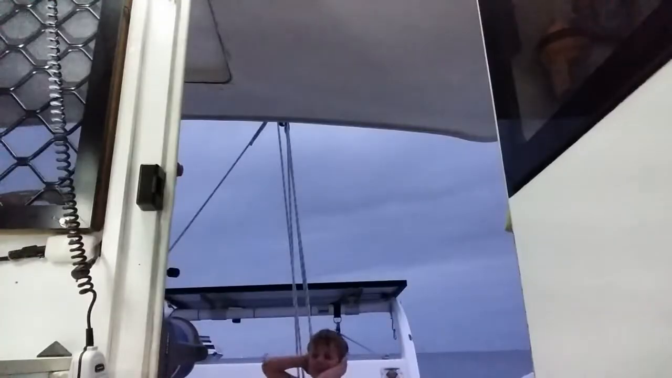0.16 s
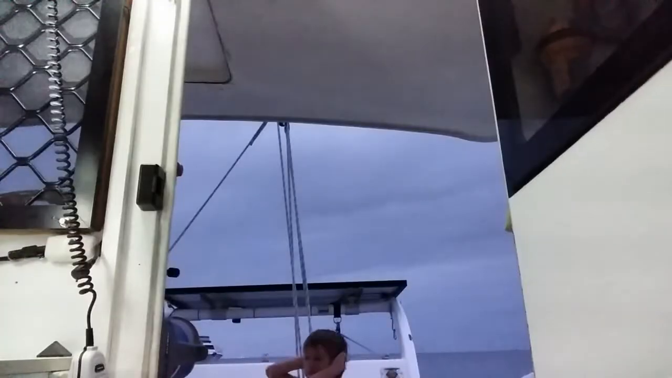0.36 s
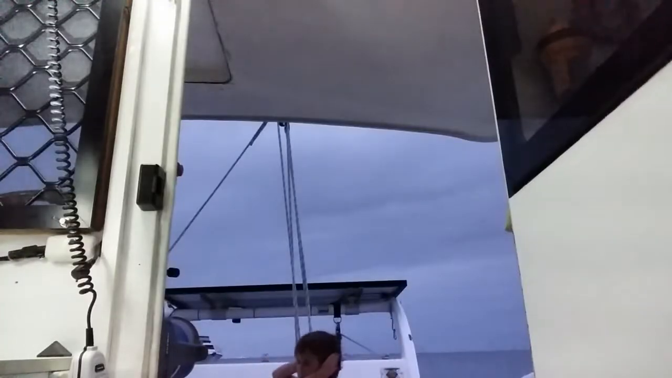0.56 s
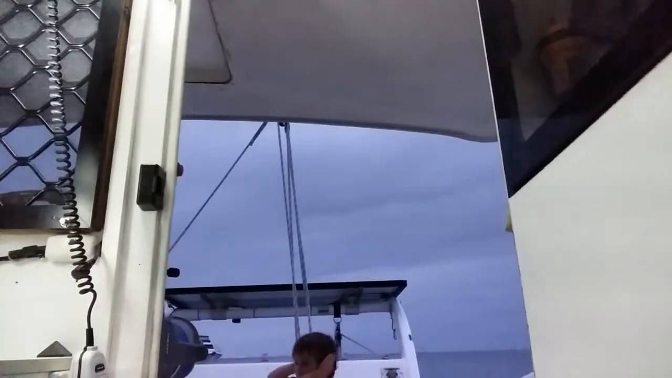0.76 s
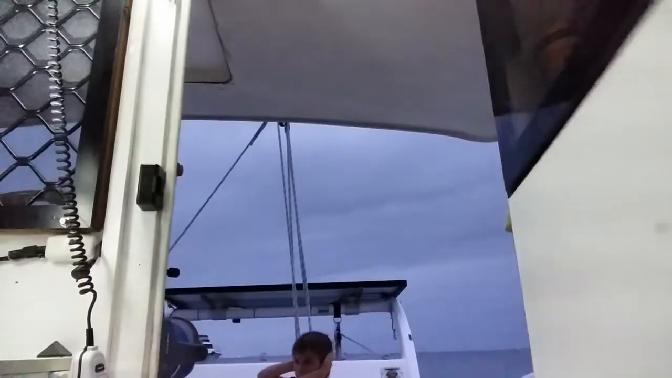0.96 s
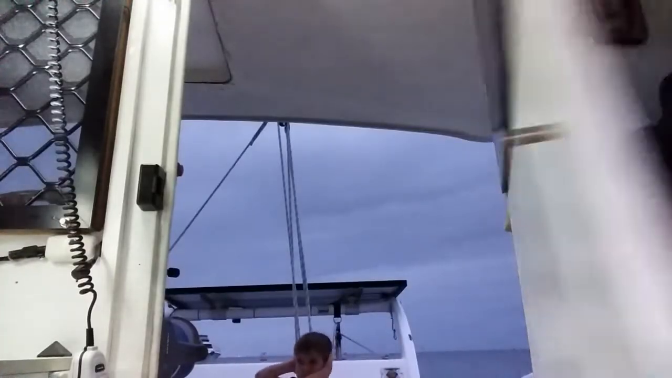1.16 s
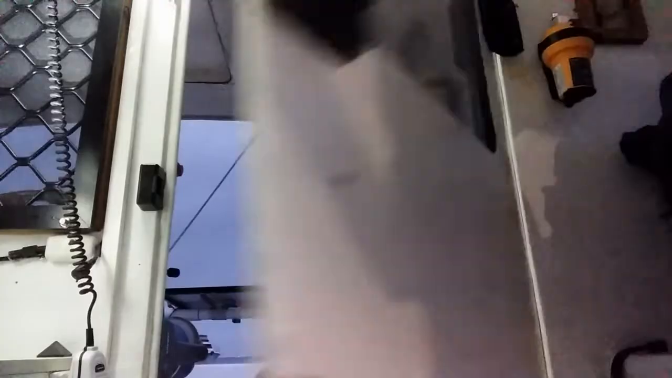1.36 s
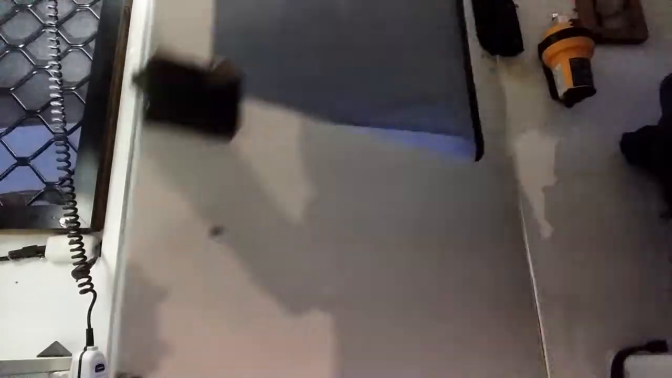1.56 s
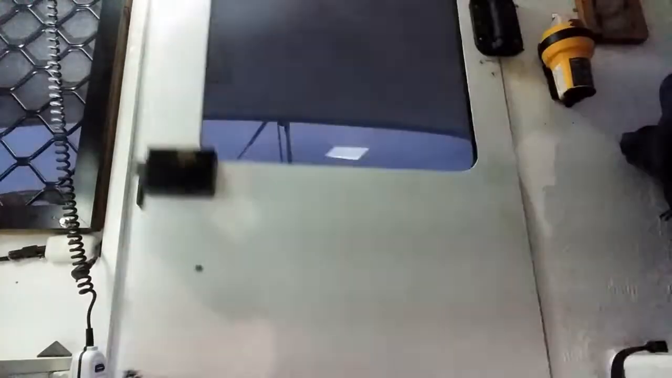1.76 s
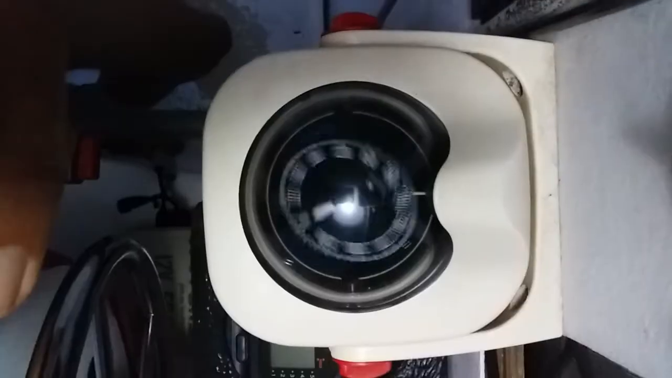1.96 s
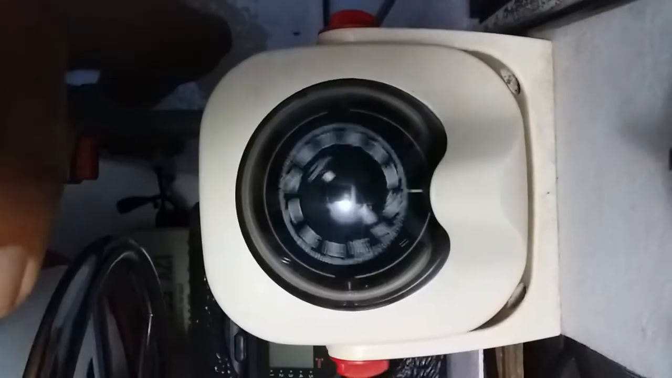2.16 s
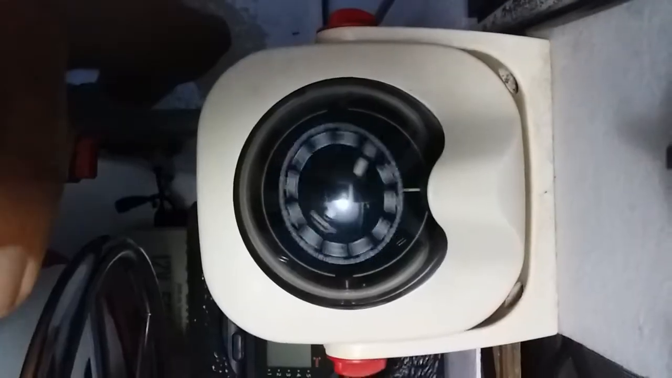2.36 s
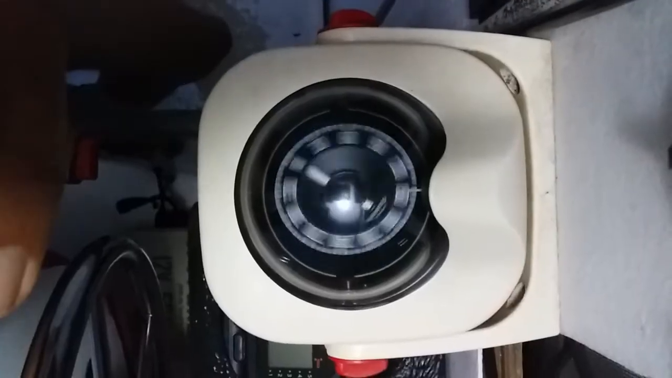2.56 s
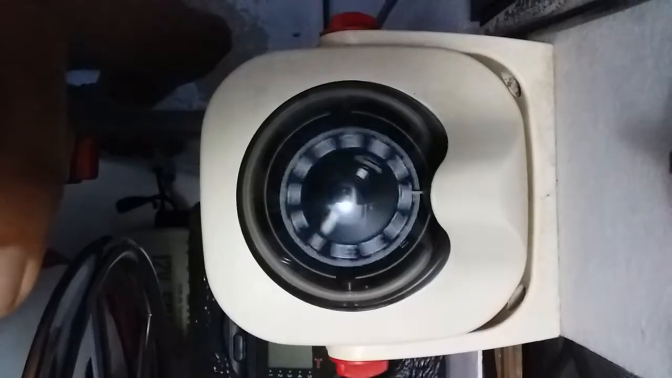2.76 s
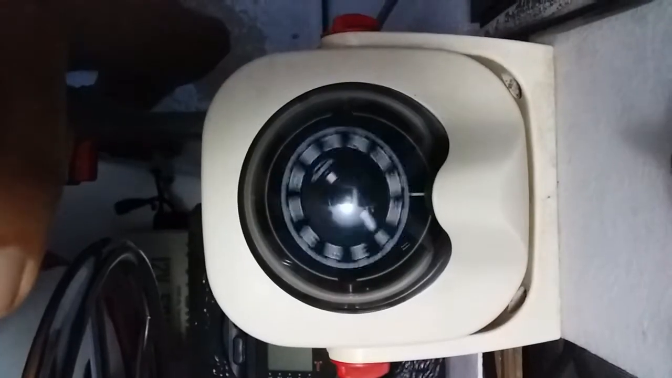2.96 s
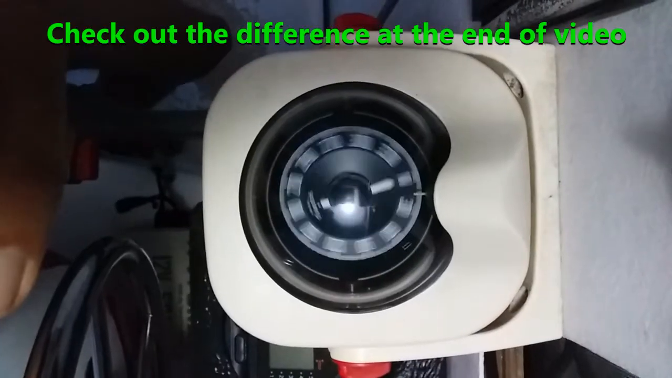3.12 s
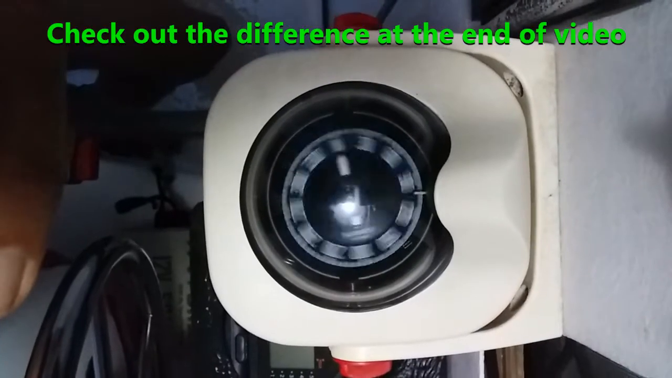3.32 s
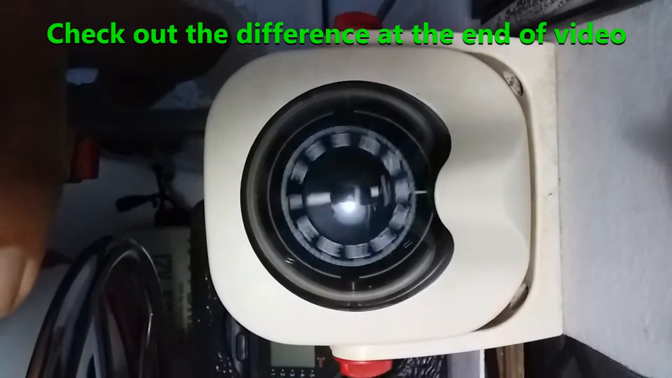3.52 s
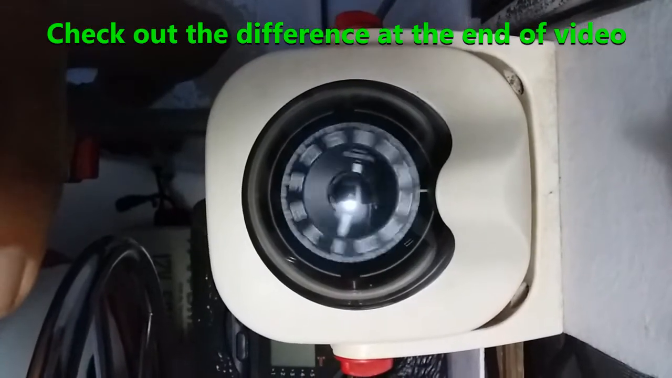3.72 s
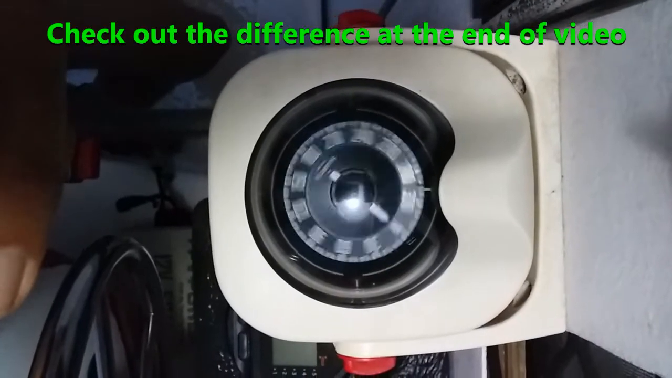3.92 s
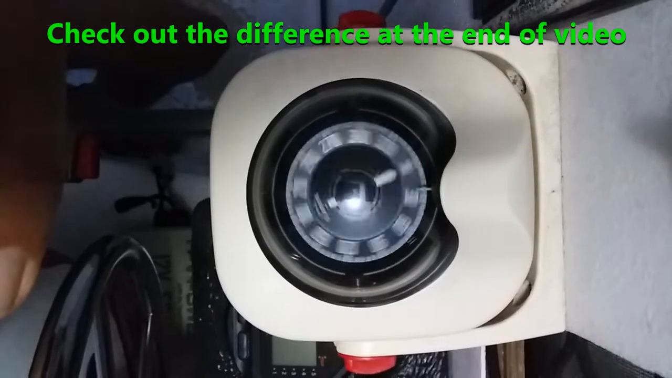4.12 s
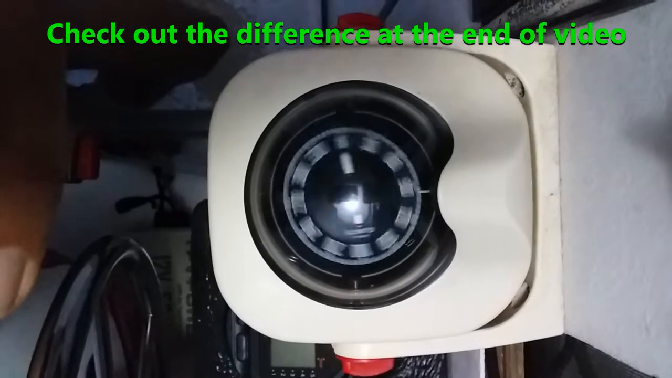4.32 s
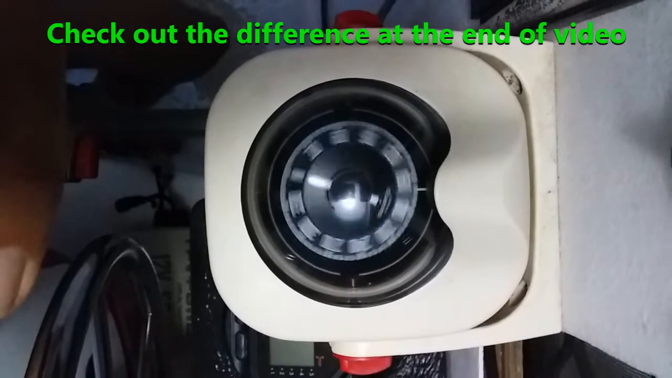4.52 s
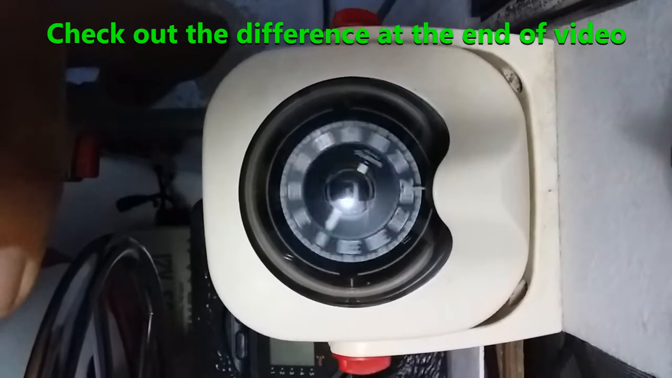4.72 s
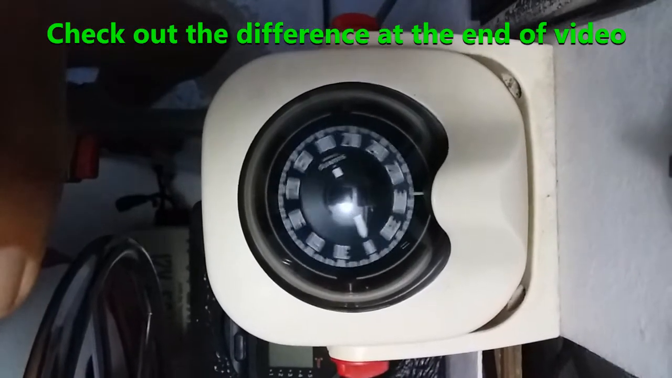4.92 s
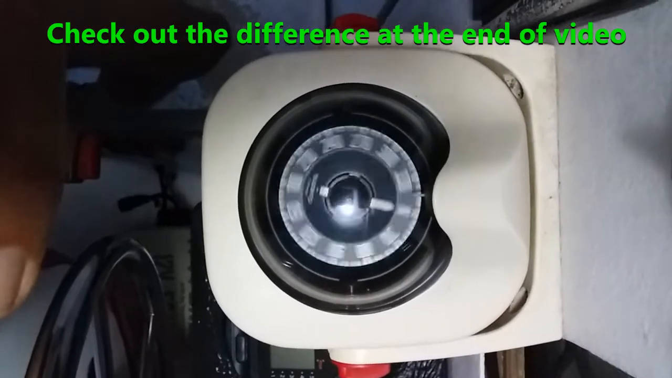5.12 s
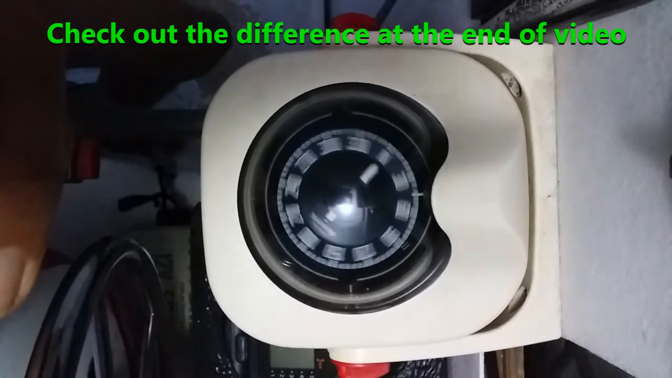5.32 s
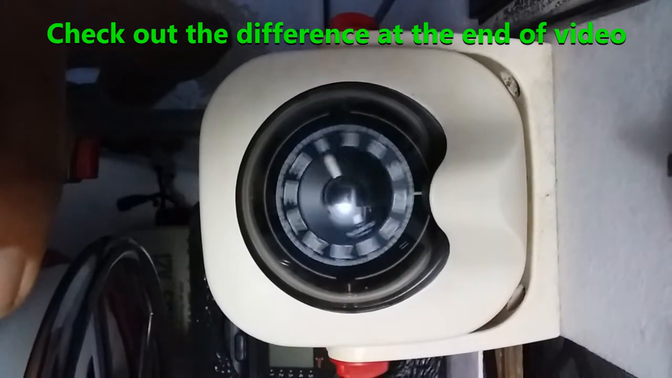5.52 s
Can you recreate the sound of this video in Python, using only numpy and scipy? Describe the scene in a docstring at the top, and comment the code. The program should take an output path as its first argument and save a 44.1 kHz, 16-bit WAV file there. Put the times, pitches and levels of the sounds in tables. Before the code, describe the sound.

A boat cabin heard from close by. At first there is a quiet, wavering low rumble from outside, steady hiss and a barely audible, very high whine. A faint tick comes near 0.4 s, then at 0.8-0.95 s the door is unhooked in a quick clatter of clunks and metal clinks. Light knocks and a tiny hinge creak follow while stirred air softly swells. At 1.86 s the door slams: a hard crack, deep panel boom and rapid shuddering rebounds, with loose parts rattling. Near 2 s the latch pings and thumps, then two loud hollow knocks land at 2.15-2.2 s, with small chattering squeaks until 2.5 s. The background is pushed down by the loud peaks and recovers around 3.2 s, revealing a slow, low buzzing motor with repeating rattle and unsteady rushing. Faint knocks pass near 3 s; soft deck thuds and sharper knocks come at 5.3-5.55 s.

```python
"""A low rumble from outside a boat's cabin comes first, with a hiss and a thin whine; then the door is unhooked.
It swings and slams: ringing modes make its panel boom, shaped noise makes the clatter, and the rebounds shudder.
The rumble gives way to a slow motor, built from shaft harmonics, a repeating rattle and rushing noise.
Knocks come before and after the slam, the latch pings and squeaks, and late thuds come through the deck.
Loud peaks turn the recorder's gain down; it recovers about a second after the last of them."""
import sys
import numpy as np
from scipy import signal
from scipy.fft import irfft
from scipy.io import wavfile
from scipy.ndimage import minimum_filter1d

SR = 44100
rng = np.random.default_rng(int(sys.argv[2]) if len(sys.argv) > 2 else 0)


def int16_out(signal):
    """Quantize to a 16-bit WAV file."""
    q = np.round(np.clip(np.atleast_2d(signal).T, -1, 1) * 32767)
    wavfile.write(sys.argv[1], SR, q.astype(np.int16))


N = 246078
T = np.arange(N) / SR

# Levels in the tables are relative; t60 is the time a sound takes to fall by 60 dB.
# outside rumble: (f/Hz, level/dB per Hz)
OUTSIDE_SPECTRUM = [(25, -20.5), (42, 4), (70, -2), (110, 4), (170, -13), (300, -12), (500, -30),
                    (900, -18), (1100, -28), (1370, -20.5), (1650, -40.5), (2200, -22.5), (3200, -45.5),
                    (9000, -44)]
# steady hiss: (f/Hz, level/dB per Hz)
HISS_SPECTRUM = [(100, 11), (2500, 0.5), (3300, -5), (4400, -4.5), (5300, 2), (7000, -1), (8700, -1),
                 (9500, -20), (14000, -21), (15500, -9.5)]
# blows on the door: (t/s, clatter level/dB, contact hardness f/Hz, clatter t60/s)
DOOR_BLOWS = [(0.364, -51, 9000, 0.14), (0.370, -43.5, 13500, 0.31), (0.7975, -44.5, 6050, 0.11),
              (0.8178, -25, 4950, 0.029), (0.830, -31, 2830, 0.15), (0.8404, -19, 4130, 0.057),
              (0.864, -24.5, 2690, 0.14), (0.893, -40, 1690, 0.4), (0.936, -45, 5900, 0.032),
              (0.986, -37, 2020, 0.11), (2.011, -23.5, 890, .14), (2.029, -16.5, 9800, 0.08),
              (2.117, -33, 2910, 0.14), (2.2919, -37, 17080, 0.22)]
# ringing tones of the door panel: (f/Hz, level/dB, t60/s)
PANEL_MODES = [(57, -21.5, 0.12), (104, -2, 0.23), (126.4, -2.5, 0.22), (150.7, -6.5, 0.41),
               (187.5, 1.5, 0.14), (223, -10.5, 0.22), (271.3, -2.5, 0.12), (383, -4.5, 0.19),
               (444, -10.5, 0.17), (492.3, -8.5, 0.24), (524, -6, 0.15), (657.6, -10, 0.17),
               (761, -24.5, 0.28), (815, -23.5, 0.35), (965.5, -20.5, 0.25)]
# clatter of the loose fittings and cabin walls: (f/Hz, level/dB per Hz)
CLATTER_SPECTRUM = [(60, -23), (150, -13), (300, 2.5), (700, -0.5), (1100, -0.5), (2000, 0), (3200, -4),
                    (4600, -5), (7000, -4), (8900, -0.5), (10000, -16.5), (16000, -20.5)]
# booming cabin air: (f/Hz, level/dB per Hz)
BOOM_SPECTRUM = [(30, -19), (55, 0.5), (100, -9.5), (150, 5), (260, 0), (320, -11.5), (450, 0),
                 (700, -22.5), (1200, -42), (3000, -56.5)]
# resonances of the door frame: (f/Hz, width/Hz, lift level/dB)
FRAME_RESONANCES = [(280, 49, 7.5), (494.4, 9.3, 6), (748, 61, 5), (997, 65, 3.5), (1150, 36, -2.5),
                    (1540, 22, 4), (1932, 53, 3.5), (2318, 31, 8.5), (3140, 130, 2.5), (4026, 22, 6.5)]
# door hook and catch, clusters of tones: (f/Hz, width/Hz, level/dB, t60/s)
HOOK_AND_CATCH_MODES = [(2665, 740, 0, 0.032), (1990, 350, -5.5, 0.076), (253, 66, -12, 0.49)]
# strikes on the hook and catch: (t/s, level/dB)
HOOK_AND_CATCH_STRIKES = [(0.842, -23.5), (0.864, -27.5), (2.031, -15)]
# knocks on a hollow casing close by: (t/s, level/dB, contact hardness f/Hz, t60/s)
CASING_KNOCKS = [(1.149, -44.5, 1400, .22), (1.454, -43.5, 1780, 0.15), (1.705, -54, 1690, 0.11),
                 (1.756, -47, 2200, 0.38), (2.154, -11, 3560, 0.17), (2.200, -8, 2500, 0.11),
                 (2.410, -36.5, 1520, 0.18), (2.453, -35, 2800, 0.28), (2.480, -35, 2010, 0.2),
                 (2.933, -40, 1600, 0.12), (2.992, -44, 1600, 0.24), (3.125, -50.5, 1390, 0.15),
                 (3.200, -48.5, 1400, 0.13), (5.275, -54.5, 3000, 0.29), (5.4565, -39.5, 774, 0.17),
                 (5.475, -48, 2510, .12), (5.486, -31, 1720, 0.21), (5.5115, -25.5, 2640, 0.22),
                 (5.545, -41.5, 5750, 0.11)]
# clatter of the casing: (f/Hz, level/dB per Hz)
CASING_SPECTRUM = [(60, -25), (150, -8.5), (300, -1), (600, -7.5), (800, 1.5), (950, -6.5), (1300, 1),
                   (1600, -1), (2300, -4), (3200, -4), (4600, -9.5), (8900, -4), (10000, -17.5),
                   (16000, -23.5)]
# resonances of the hollow casing: (f/Hz, width/Hz, lift level/dB)
CASING_RESONANCES = [(264.5, 12, 7.5), (480, 110, 9), (672, 37, 15), (1454, 87, 8), (1869, 85, 7.5),
                     (2170, 74, 5), (3000, 100, 0)]
# hinge, a cluster of tones: (f/Hz, width/Hz, level/dB, t60/s)
HINGE_MODES = [(990, 210, 0, 0.094)]
# short creaks of the hinge: (t/s, level/dB)
HINGE_CREAKS = [(1.150, -52), (1.758, -45), (1.783, -46)]
# the motor's strong harmonics: (multiple of the shaft rate, level/dB)
STRONG_HARMONICS = [(5, -3), (8, 2), (10, 2.5), (11, 1), (12, -6), (13, 1), (14, -8), (15, 3), (16, -4),
                    (19, -9.5), (22, -9), (24, -13.5)]
# motor rattle: (f/Hz, level/dB per Hz)
RATTLE_SPECTRUM = [(45, -22), (130, 0.5), (450, 3), (560, -1.5), (680, -10), (780, -8), (920, -3.5),
                   (1030, 3), (1250, -2.5), (1650, -8), (2200, -6.5), (3000, -12.5), (4000, -32.5)]
# deeper part of the motor's rushing: (f/Hz, level/dB per Hz)
RUSH_SPECTRUM = [(30, -24), (60, -3.5), (100, 10.5), (200, 9), (350, 7.5), (600, -1.5), (800, -11),
                 (1100, -7.5), (1700, -31.5), (2800, -17), (4000, -29.5), (5500, -10), (7000, -30),
                 (15000, -116.5)]
# wash in the motor's rushing: (f/Hz, level/dB per Hz)
WASH_SPECTRUM = [(300, -10), (700, 3.5), (1100, 4), (1700, -5.5), (2300, -1.5), (3000, 1), (4200, -9.5),
                 (9000, -46)]
# slow change of the motor's loudness: (t/s, level/dB)
MOTOR_LEVEL = [(2.6, -.5), (3.1, -1.5), (3.6, 2), (4.0, 0), (5.4, -.3)]
# loose parts shaken by the slam, lightest first: (f/Hz, width/Hz, level/dB, t60/s)
LOOSE_PARTS = [(8794, 460, -7, 0.047), (3620, 600, -6.5, 0.082), (490.5, 180, 0, 0.085),
               (182, 3.3, -4, .28)]
# the door's thin skin, slapped at every rebound: (f/Hz, width/Hz, level/dB, t60/s)
SKIN_MODES = [(429, 240, -8.5, .08)]
# ringing tones of the steel latch: (f/Hz, level/dB, t60/s)
LATCH_MODES = [(3620, -15.5, 0.23), (6850, -8.5, 0.089), (8030, -12, 0.072), (8450, -5, .11),
               (9495, -1, .12), (9460, -10.5, .1), (12900, -24.5, 0.092), (15400, -12.5, 0.086)]
# strikes on the latch: (t/s, level/dB)
LATCH_PINGS = [(1.972, -5.5), (2.2915, -20.5)]
# latch squeaks: (t/s, length/s, start f/Hz, end f/Hz, level/dB)
LATCH_SQUEAKS = [(2.321, 0.028, 2380, 1790, -36.5), (2.343, 0.037, 2180, 2285, -33),
                 (2.365, 0.052, 1890, 1650, -43.5), (2.391, 0.059, 3210, 2610, -39.5),
                 (2.436, .045, 2078, 2137, -30.5)]
# ringing tones of the deck: (f/Hz, level/dB, t60/s)
DECK_MODES = [(72, -24, 0.17), (97.4, 12.5, 0.14), (132, 10, 0.26), (148.6, 13, 0.17), (205.3, 2, 0.35)]
# soft thuds through the deck: (t/s, level/dB)
DECK_THUDS = [(5.271, -32), (5.281, -27.5), (5.312, -35), (5.4565, -36), (5.490, -27)]

# air stirred by the door swells until it swings fastest, then holds until the slam
SWING_FASTEST_S, SWING_DB, SWING_RISE_DB_PER_S = 1.3, -65, 27
# a softer contact pushes the panel more: boom equals clatter at EVEN_HZ and falls with every octave above it
EVEN_HZ, BOOM_DB_PER_OCTAVE = 1800, 12.5
# every knock stirs the panel a little and bounces once
KNOCK_BOOM_DB, BOUNCE_S, BOUNCE_DB = -17.5, .013, -6
# the rumble starts to give way to the motor
MOTOR_START_S = 1.77
SHAFT_HZ = 22.43
# the other harmonics lie under one broad hump, 1 dB down at HUMP_WIDTH_HZ from the centre
HUMP_HZ, HUMP_WIDTH_HZ, HUMP_DB = 311, 47, -11.5
# the slam: one hard, short contact
SLAM_S, SLAM_DB, SLAM_HARD_HZ, SLAM_T60_S = 1.8604, 0.5, 12200, 0.1
# heavier loose parts start later, by this much for each octave they ring lower
LAG_S_PER_OCTAVE = .0198
# the door then shudders against its frame, its rebounds weakening on average
REBOUND_GAP_S, REBOUND_HARD_HZ, REBOUND_T60_S = .0168, 6486, .21
REBOUND_DB, REBOUND_FALL_DB_PER_S = -2, 57.5
SHUDDER_BOOM_DB, BOOM_FALL_DB_PER_S = 1, 23.5
TOP_HZ = 16000


def undb(db):
    """Turn decibels into a gain."""
    return 10 ** (np.asarray(db) / 20)


def unit(x):
    """Scale to an average strength (rms) of 1."""
    return x / np.sqrt(np.mean(x ** 2))


def noise(points, size=N, peaks=()):
    """Make noise of rms 1 that follows a spectrum, lifted at some resonances."""
    f = np.fft.rfftfreq(size, 1 / SR) + 1e-3
    hz, db = np.transpose(points)
    shape = np.interp(np.log(f), np.log(hz), db)
    for centre, width, lift in peaks:
        shape = shape + lift / (1 + (2 * (f - centre) / width) ** 2)
    random_phase = np.exp(2j * np.pi * rng.random(len(f)))
    return unit(irfft(undb(shape) * random_phase, size))


def wander(rate):
    """Join random points, rate of them per second, into a wandering line with a spread near 1."""
    points = rng.standard_normal(1024)
    return np.interp(T * rate, np.arange(len(points)), points)


def fade(t, t60):
    """Die away smoothly, 60 dB down after t60 seconds."""
    return np.exp(-np.log(1000) * t / t60)


def lowpass(x, hz):
    """Take away the treble above hz with a two-pole filter."""
    return signal.sosfilt(signal.butter(2, min(hz, .45 * SR), fs=SR, output="sos"), x)


def add(out, s, x):
    """Mix x into out from time s on."""
    i = int(s * SR)
    out[i:i + len(x)] += x[:N - i]


def ring(modes, t):
    """Let struck tones ring and die away, starting at rms 1."""
    power = sum(undb(db) ** 2 for _, db, _ in modes) / 2
    tones = sum(undb(db) * fade(t, t60) * np.sin(2 * np.pi * hz * t) for hz, db, t60 in modes)
    return tones / np.sqrt(power)


def strikes(events, modes, contact_s):
    """One object rings with the same tones at every strike."""
    out, t = np.zeros(N), T[:2 ** 15]
    sound = ring(modes, t) * (1 - np.exp(-t / contact_s))
    for s, db in events:
        add(out, s, undb(db) * sound)
    return out


def clusters(events, modes, rise_s=0.0011, count=7):
    """A loose part rings with clusters of close tones at every strike."""
    out, t = np.zeros(N), T[:2 ** 14]
    for s, strike_db in events:
        for hz, width, db, t60 in modes:
            even = hz + width * np.linspace(-.5, .5, count)
            uneven = even + width / count * rng.uniform(-0.32, 0.25, count)
            sound = sum(np.sin(2 * np.pi * (f * t + rng.random())) for f in uneven)
            envelope = fade(t, t60) * (1 - np.exp(-t / rise_s))
            add(out, s, undb(strike_db + db) * unit(sound) * envelope)
    return out


def blows(events, spectrum, resonances, crack_db, cabin_db, grain_db, shared, spread_s, edge_db,
          crack_s=0.0091, cabin_t60=0.22, build_s=.005, tail_db=-25, tail_t60=0.31):
    """Each blow (t/s, level/dB, hardness f/Hz, boom level/dB, t60/s) clatters a body and booms panel and air."""
    out, t = np.zeros(N), T[:2 ** 14]
    panel = ring(PANEL_MODES, t)
    walls = noise(spectrum, len(t), resonances)
    for s, db, hard_hz, boom_db, t60 in events:
        crack = undb(crack_db) * fade(t, crack_s)
        tail = undb(tail_db) * fade(t, tail_t60)
        decay = np.sqrt(fade(t, t60) ** 2 + crack ** 2 + tail ** 2)
        # the same walls answer every blow; the rest depends on the spot that is struck
        spot = noise(spectrum, len(t), resonances)
        texture = np.sqrt(shared) * walls + np.sqrt(1 - shared) * spot
        # loose parts chatter, so the decay comes in lumps
        chatter = unit(undb(grain_db * wander(260)[:len(t)]))
        clatter = undb(db) * texture * chatter * decay * (1 - np.exp(-t / spread_s))
        # the low resonances take a few crossings to build up
        cabin = undb(cabin_db) * noise(BOOM_SPECTRUM, len(t)) * fade(t, cabin_t60)
        boom = undb(boom_db) * (panel + cabin) * (1 - np.exp(-t / build_s))
        # a softer contact leaves out the treble, though hard edges still add a thin tick
        tick = undb(edge_db) * np.diff(clatter, 2, prepend=[0, 0])
        add(out, s, lowpass(clatter + boom, hard_hz) + tick)
    return out


def motor_share():
    """How far the rumble has given way to the motor, from 0 to 1 within 0.1 s."""
    return np.clip((T - MOTOR_START_S) / 0.1, 0, 1)


def outside(level_db=-64):
    """Wavering low noise comes in from outside until it gives way to the motor."""
    rumble = noise(OUTSIDE_SPECTRUM) * undb(level_db + 0.92 * wander(5.7))
    return (1 - motor_share()) * rumble


def hiss_and_whine(hiss_db=-69, whine_db=-84, whine_hz=15001):
    """Steady noise hisses throughout, with one thin, very high tone."""
    whine = np.sin(2 * np.pi * whine_hz * T)
    return undb(hiss_db) * noise(HISS_SPECTRUM) + undb(whine_db) * whine


def swing_air():
    """The swinging door stirs the air, a soft noise that grows and ends at the slam."""
    swing_db = SWING_DB - SWING_RISE_DB_PER_S * np.maximum(SWING_FASTEST_S - T, 0)
    return lowpass(noise(CLATTER_SPECTRUM), 3500) * undb(swing_db) * (T < SLAM_S)


def door():
    """Single blows and the slam's first contact; the softer the contact, the more the panel booms."""
    rows = list(DOOR_BLOWS) + [(SLAM_S, SLAM_DB, SLAM_HARD_HZ, SLAM_T60_S)]
    events = [(s, db, hard_hz, db - BOOM_DB_PER_OCTAVE * np.log2(hard_hz / EVEN_HZ), t60)
              for s, db, hard_hz, t60 in rows]
    return blows(events, CLATTER_SPECTRUM, FRAME_RESONANCES, crack_db=1.5, cabin_db=-8, grain_db=1.5,
                 shared=0.74, spread_s=0.0013, edge_db=-28)


def hook_and_catch():
    """The struck hook and catch clink with clusters of close tones."""
    return clusters(HOOK_AND_CATCH_STRIKES, HOOK_AND_CATCH_MODES)


def casing():
    """Each knock makes the hollow casing resonate and is followed by one weaker bounce."""
    events = [(s + lag, db + drop, hard_hz, db + drop + KNOCK_BOOM_DB, t60)
              for s, db, hard_hz, t60 in CASING_KNOCKS
              for lag, drop in [(0, 0), (BOUNCE_S, BOUNCE_DB)]]
    return blows(events, CASING_SPECTRUM, CASING_RESONANCES, crack_db=4.5, cabin_db=-3.5, grain_db=2.0,
                 shared=0.8, spread_s=0.00066, edge_db=-29.5)


def hinge():
    """The hinge gives short creaks, each a fading cluster of tones."""
    return clusters(HINGE_CREAKS, HINGE_MODES)


def harmonics(count=26):
    """List shaft harmonics as (multiple, level/dB): a broad hump with a few strong ones set apart."""
    strong = dict(STRONG_HARMONICS)
    return [(k, strong.get(k, HUMP_DB - ((k * SHAFT_HZ - HUMP_HZ) / HUMP_WIDTH_HZ) ** 2))
            for k in range(1, count + 1)]


def motor(hum_db=-50, rattle_db=-65.0, rush_db=-59, waver_db=3.0, drift=0.001588, wash_db=-71.5):
    """A slow motor hums at shaft harmonics, rattles the same way every turn, and rushes unsteadily."""
    turns = np.cumsum(SHAFT_HZ * (1 + drift * wander(3.0))) / SR
    # the hull delays each harmonic differently, smearing the beat of each turn into an even buzz
    smear = 1 / 16
    hum = sum(undb(db + waver_db * wander(12)) * np.sin(2 * np.pi * (k * turns - smear * k ** 2))
              for k, db in harmonics())
    one_turn = noise(RATTLE_SPECTRUM, int(SR / SHAFT_HZ))
    rattle = np.interp(turns, np.arange(len(one_turn)) / len(one_turn), one_turn, period=1)
    rattle = rattle * undb(rattle_db + 0.5 * wander(4.25))
    rush = noise(RUSH_SPECTRUM) * undb(rush_db + 0.46 * wander(12))
    wash = noise(WASH_SPECTRUM) * undb(wash_db + 0.53 * wander(40))
    level_db = np.interp(T, *np.transpose(MOTOR_LEVEL))
    return motor_share() * undb(level_db) * (undb(hum_db) * unit(hum) + rattle + rush + wash)


def shaken_parts():
    """The slam runs through the loose parts from light to heavy, each ringing lower and later."""
    lightest_hz = LOOSE_PARTS[0][0]
    out = np.zeros(N)
    for part in LOOSE_PARTS:
        start_s = SLAM_S + LAG_S_PER_OCTAVE * np.log2(lightest_hz / part[0])
        out += clusters([(start_s, 0)], [part])
    return out


def rebounds(count=7, scatter_db=2.86, jitter_s=0.00044):
    """After the slam the door hits its frame again and again, a little unevenly."""
    chance = rng.standard_normal((count, 2))
    ages = REBOUND_GAP_S * np.arange(1, count + 1) + jitter_s * chance[:, 0]
    return [(SLAM_S + age, REBOUND_DB - REBOUND_FALL_DB_PER_S * age + scatter_db * luck, REBOUND_HARD_HZ,
             SHUDDER_BOOM_DB - BOOM_FALL_DB_PER_S * age, REBOUND_T60_S)
            for age, luck in zip(ages, chance[:, 1])]


def shudder():
    """The rebounds clatter, boom and slap the door's skin."""
    hits = rebounds()
    frame = blows(hits, CLATTER_SPECTRUM, FRAME_RESONANCES, crack_db=1.5, cabin_db=-2, grain_db=2.5,
                  shared=.5, spread_s=0.001, edge_db=-11.5, tail_db=-24.5, tail_t60=0.4)
    return frame + clusters([(s, db) for s, db, *_ in hits], SKIN_MODES)


def latch_pings():
    """The struck steel latch pings with high ringing tones."""
    return strikes(LATCH_PINGS, LATCH_MODES, contact_s=.003)


def squeaks(chatter_db=5, overtone_db=-28, echo_db=-6, echo_t60=0.2, wobble=0.059):
    """The latch slides home in short, chattering slips, and the cabin echoes them."""
    out = np.zeros(N)
    for s, length, start_hz, end_hz, db in LATCH_SQUEAKS:
        u = np.linspace(0, 1, int(length * SR))
        glide = start_hz + (end_hz - start_hz) * u
        wobbly_hz = glide * (1 + wobble * wander(1185)[:len(u)])
        phase = 2 * np.pi * np.cumsum(wobbly_hz) / SR
        grip = undb(db + chatter_db * wander(380)[:len(u)]) * np.sin(np.pi * u)
        add(out, s, grip * (np.sin(phase) + undb(overtone_db) * np.sin(2 * phase)))
    t = T[:2 ** 14]
    echo = rng.standard_normal(len(t)) * fade(t, echo_t60)
    echo = echo / np.linalg.norm(echo)
    return out + undb(echo_db) * signal.fftconvolve(out, echo)[:N]


def deck():
    """Soft thuds set off the deck's low ringing tones."""
    return strikes(DECK_THUDS, DECK_MODES, contact_s=0.0026)


def scene():
    """Add up all the sounds at one microphone."""
    steady = outside() + hiss_and_whine() + motor()
    moving_door = swing_air() + door() + shudder() + hook_and_catch() + hinge()
    small_parts = casing() + shaken_parts() + latch_pings() + squeaks()
    return (steady + moving_door + small_parts + deck())[None]


def gain_control(x, threshold_db=-8, most_db=12.5, hold_s=1.057, release_s=0.11):
    """Peaks over the threshold turn the gain down at once; it is held, then creeps back."""
    over = np.clip(20 * np.log10(np.abs(x) + 1e-9) - threshold_db, 0, most_db)
    half = int(hold_s * SR / 2)
    # the largest excess within the past hold time
    held = -minimum_filter1d(-over, 2 * half + 1, origin=half, mode="constant")
    pole = np.exp(-1 / (release_s * SR))
    release = signal.lfilter([1 - pole], [1, -pole], held)
    return x * undb(-np.maximum(held, release))


def record(dry, low_cut_hz=42):
    """The recorder controls the gain, rounds the peaks, and cuts the lowest bass and the top treble."""
    ceiling = .49
    rounded = ceiling * np.tanh(gain_control(dry[0]) / ceiling)
    low_cut = signal.butter(3, low_cut_hz, "high", fs=SR, output="sos")
    top_cut = signal.ellip(10, .2, 80, TOP_HZ, fs=SR, output="sos")
    return signal.sosfilt(top_cut, signal.sosfilt(low_cut, rounded))[None]


dry = scene()
out = record(dry)
int16_out(out)
```